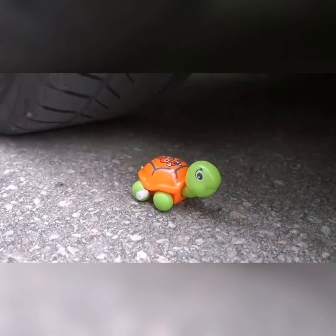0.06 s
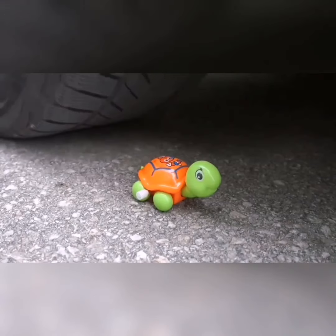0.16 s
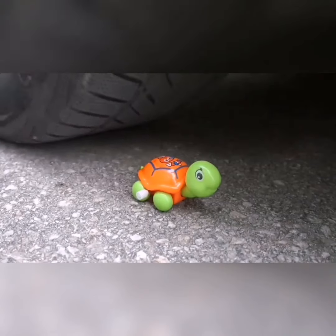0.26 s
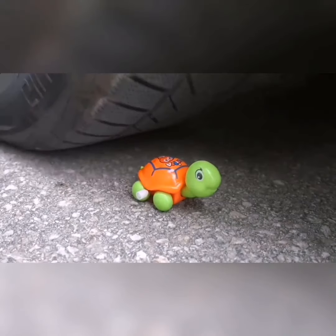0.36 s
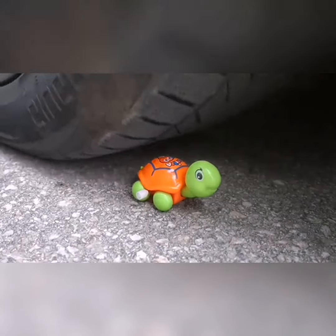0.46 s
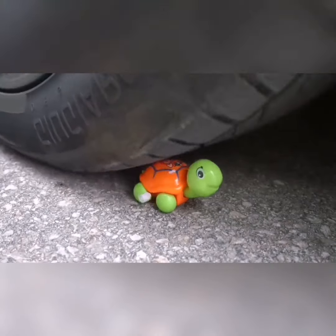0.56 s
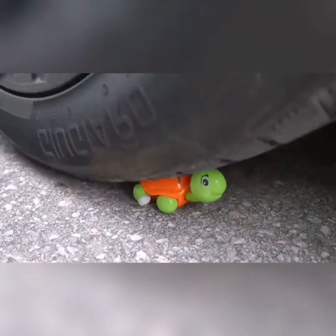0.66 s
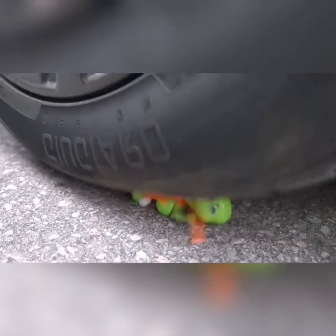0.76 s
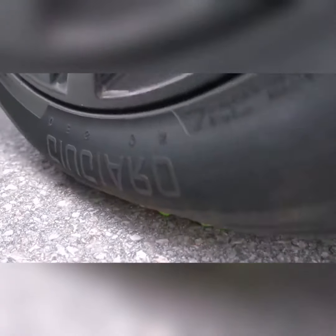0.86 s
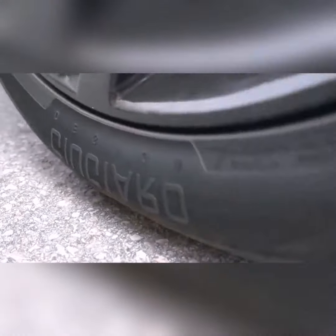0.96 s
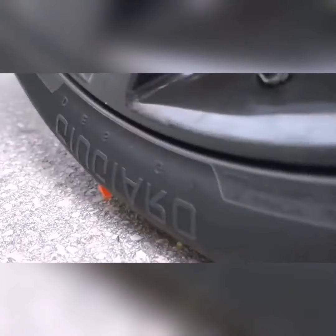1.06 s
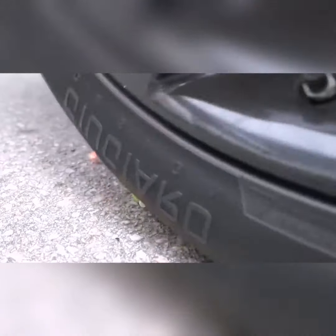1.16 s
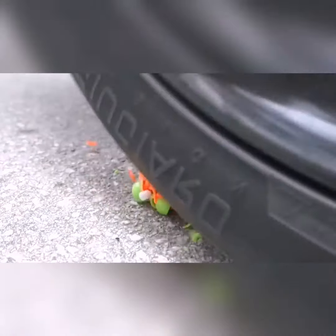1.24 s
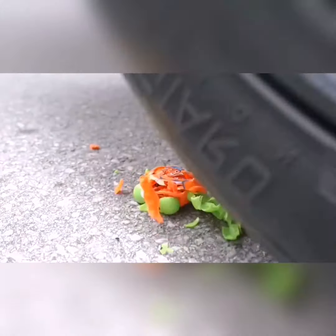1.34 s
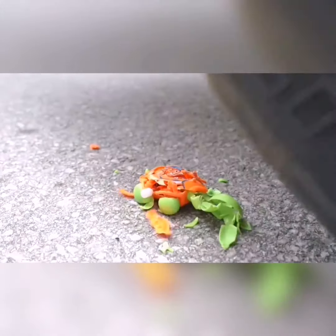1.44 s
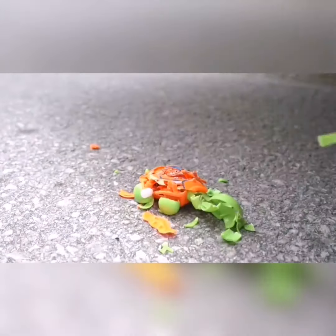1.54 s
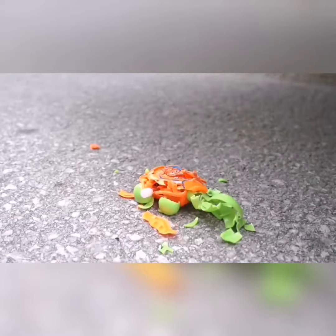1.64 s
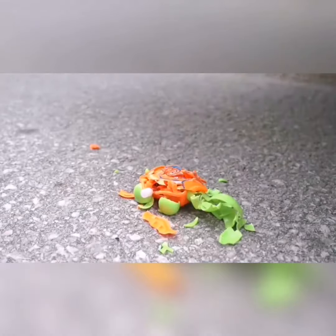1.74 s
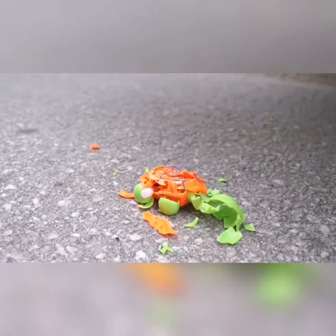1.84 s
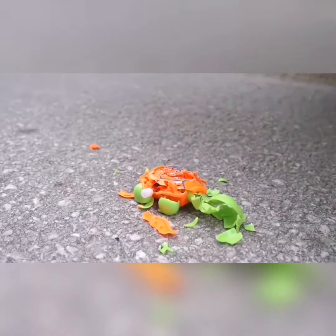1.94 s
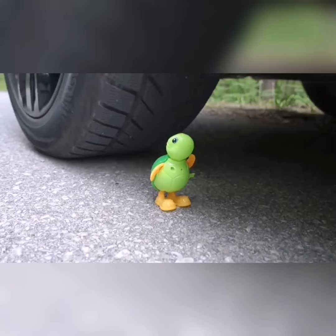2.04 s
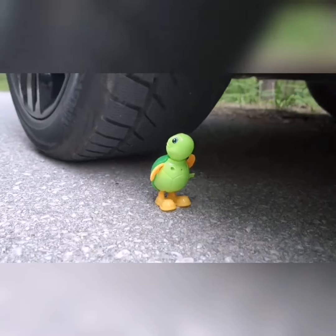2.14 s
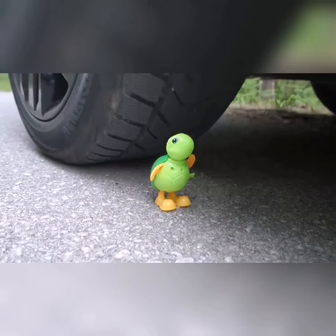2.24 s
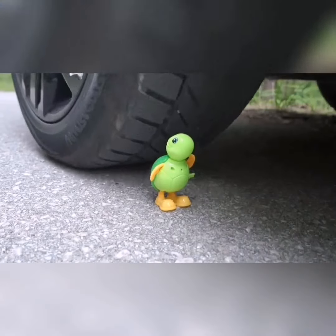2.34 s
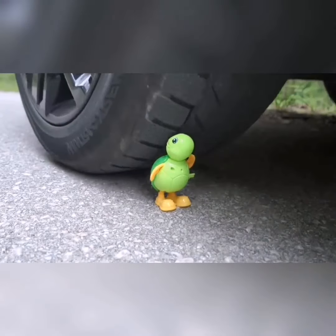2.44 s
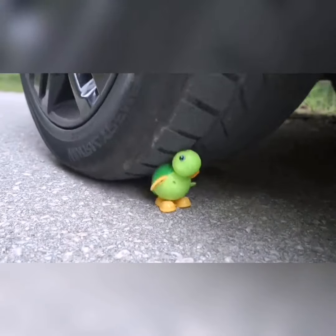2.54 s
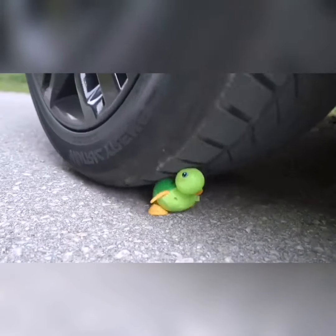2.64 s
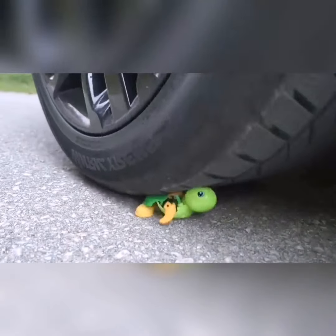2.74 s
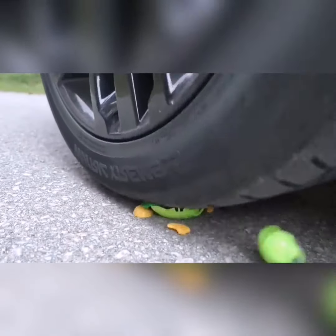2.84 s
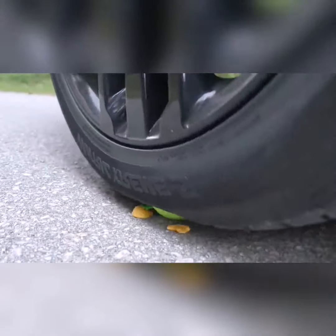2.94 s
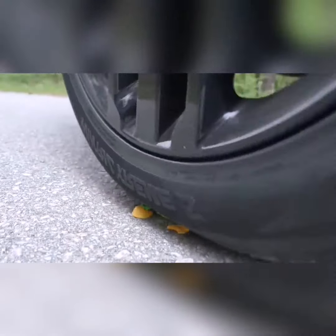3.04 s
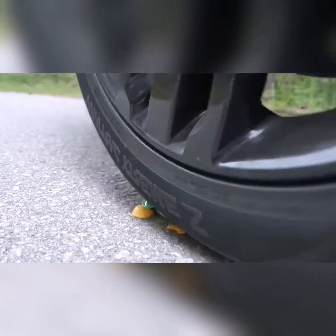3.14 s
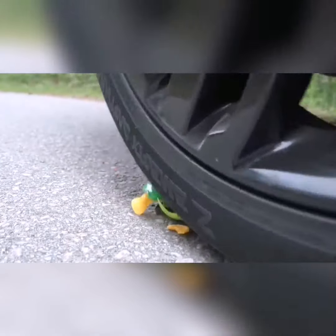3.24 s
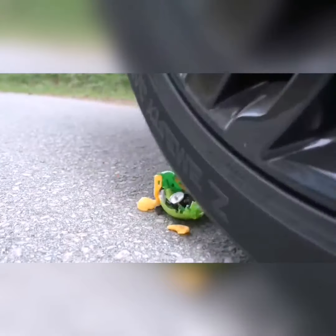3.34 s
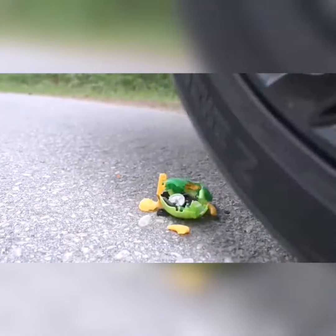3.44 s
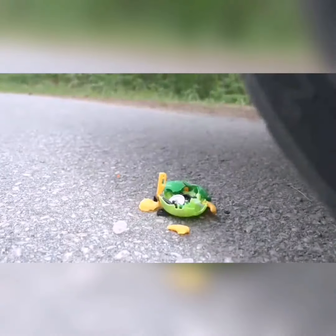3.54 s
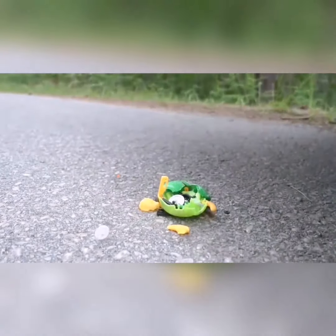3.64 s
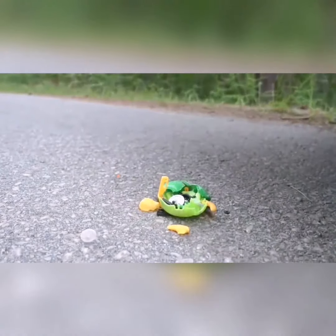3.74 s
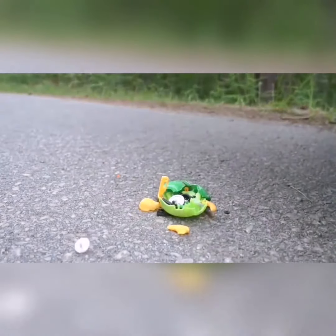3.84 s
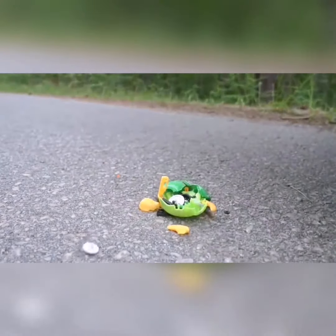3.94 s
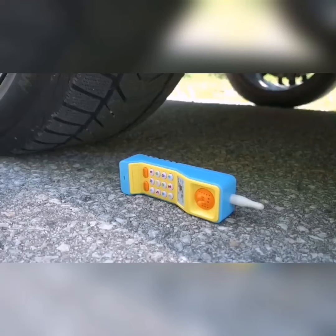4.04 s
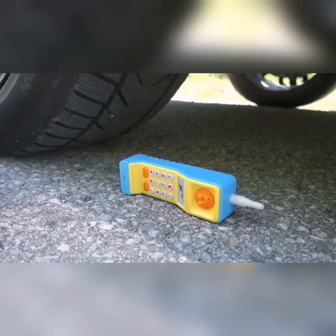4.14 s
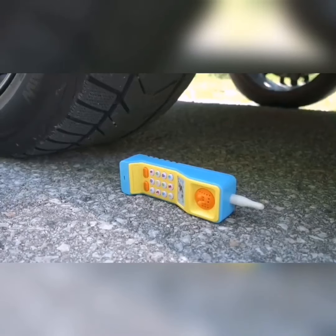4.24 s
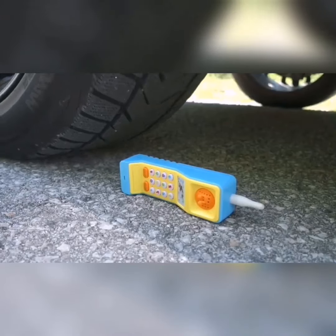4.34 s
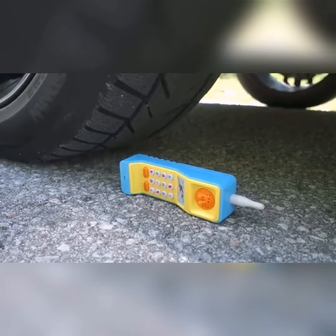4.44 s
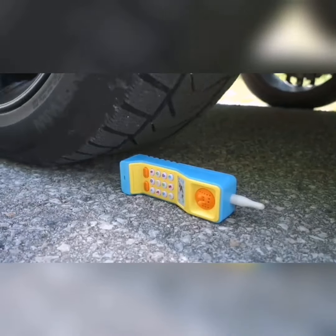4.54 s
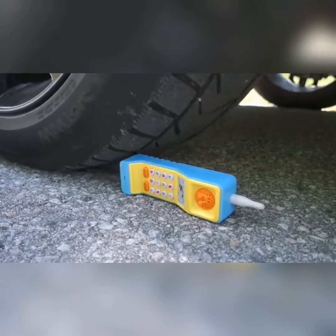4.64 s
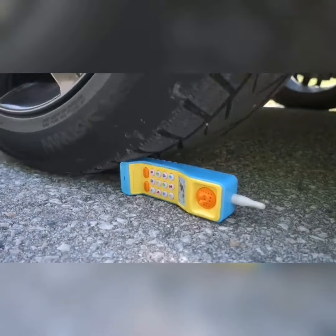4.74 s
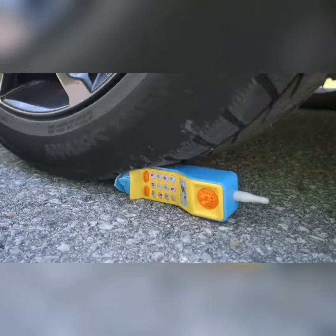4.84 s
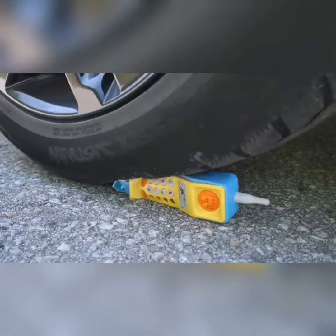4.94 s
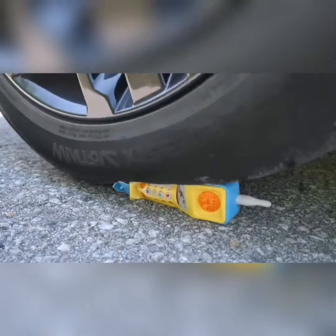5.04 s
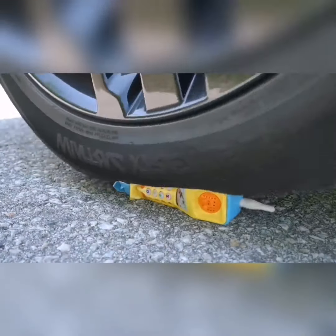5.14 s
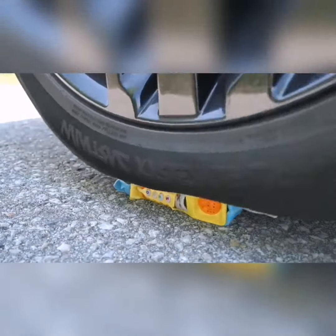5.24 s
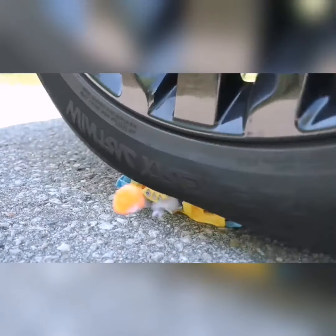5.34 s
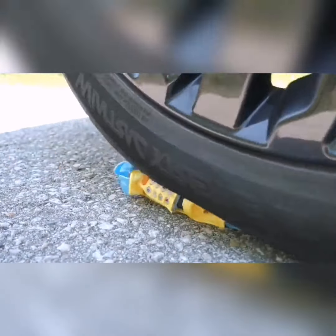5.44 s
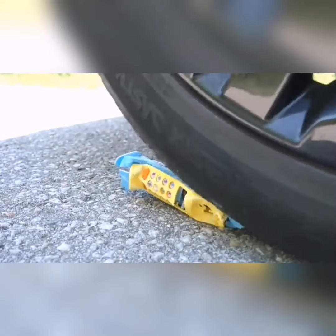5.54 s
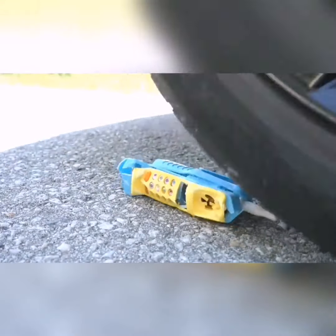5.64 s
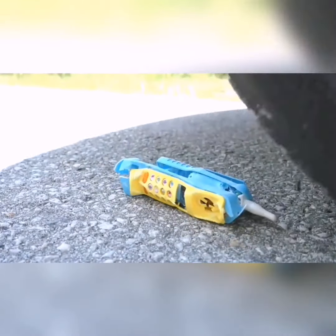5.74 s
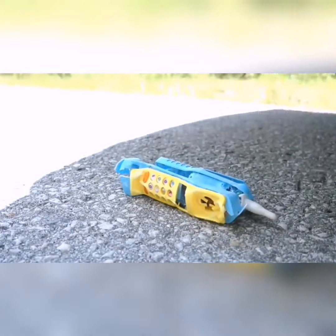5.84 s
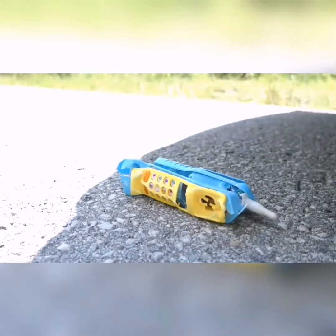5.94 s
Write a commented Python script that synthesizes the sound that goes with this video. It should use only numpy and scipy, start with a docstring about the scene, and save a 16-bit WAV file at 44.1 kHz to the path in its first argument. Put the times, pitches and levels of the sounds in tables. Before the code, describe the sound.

Close-up brittle plastic crunches under a rolling tyre in three separate bursts, ticking fragments between them, over a low car murmur.

```python
"""First the low murmur of a car on asphalt, then it creeps over three hollow plastic toys close to the
microphone: a turtle, a bird, a toy phone. Each shell gives way in sharp cracks and a crunch of hundreds of small
snaps; fragments knock under the rubber, the tyre thuds and the air inside it hums at one beating pitch.
Loose pieces tick as the wheel rolls off. Shards and knocks are damped sines, car and tread coloured noise."""
import sys
import numpy as np
from scipy import signal
from scipy.fft import rfft, irfft
from scipy.io import wavfile
from scipy.ndimage import uniform_filter1d

SR = 44100
rng = np.random.default_rng(int(sys.argv[2]) if len(sys.argv) > 2 else 0)


def master(y):
    """Save y as 16-bit WAV."""
    cut = np.clip(np.atleast_2d(y).T, -1, 1)
    pcm = np.round(cut * 32767)  # scale
    wavfile.write(sys.argv[1], SR, pcm.astype(np.int16))


N = 263718
TIME = np.arange(N) / SR   # s
AGE = TIME[:4096]   # s, time axis of one short sound or response
CUTOFF_HZ = 11200

# The car rolling. Each row: time in seconds, murmur level in dB, tread hiss level in dB.
ROLLING = [(0, -48.5, -55.5), (.3, -47, -51.5), (.6, -47, -47.5), (1.35, -58, -64), (1.58, -53, -60),
           (1.68, -48.5, -44.5), (2.0, -48, -46), (2.04, -50, -56), (2.52, -49, -49.5), (3.5, -51, -47),
           (3.98, -48, -51), (4.02, -52, -55), (4.28, -48.5, -50.5), (4.38, -46.5, -46.5),
           (4.55, -49.5, -47.5), (4.75, -45, -43), (5.8, -54.5, -54.5), (5.98, -50.5, -48.5)]
# Deep rumble of the car. Each row: time in seconds, level in dB.
RUMBLE = [(0, -71), (2.0, -57), (2.06, -61), (3.6, -54), (4.7, -64), (5.98, -59)]
# Faint whistles from the car as it first draws near. Each row: pitch in Hz, width in Hz, relative level in dB.
WHISTLES = [(1183, 14, -65), (2690, 49, -58), (3730, 23, -66), (4760, 29, -68)]
# Strength of those whistles. Each row: time in seconds, gain in dB.
WHISTLING = [(0, -13), (.7, 7), (2.0, -13), (2.04, -26)]
# Colour of the car's murmur. Each row: frequency in Hz, relative level in dB.
MURMUR_COLOUR = [(18, -5), (30, -17), (146, -4.5), (161, -11), (196, 7.5), (257, -3.5), (298, 2.5),
                 (355, -6), (382, 2.5), (514, -3.5), (582, 2), (864, -9), (1160, -8.5), (2690, -19),
                 (11000, -39.5), (14300, -81), (22000, -120)]
# Colour of the tread hissing on asphalt. Each row: frequency in Hz, relative level in dB.
HISS_COLOUR = [(300, -9), (900, 2), (1600, 5), (2800, 2), (5000, -9), (10500, -17), (14000, -57)]
# Turtle, bird, phone under the wheel. Each row: first touch in seconds, tread lifts off in seconds,
# debris and body resonances end at in seconds, relative level of loose debris in dB.
TOYS = [(0.627, 1.325, 2.02, -7.5), (2.532, 3.504, 3.74, -8.5), (4.716, 5.717, 5.98, -14)]
# A shell gives way in stages, the last ones as it springs back behind the tyre. Each row: start in seconds,
# hold in seconds, fade in dB per second, then relative levels in dB of splintering, knocking under the tread
# and tyre thud.
COLLAPSES = [(0.631, 0.08, 98, -21, -25.5, -37), (0.712, 0.013, 177, -41, -14.5, -25),
             (0.846, 0.039, 136, -26, -17, -19), (0.935, 0.044, 85, -25, -17, -34),
             (1.122, 0.035, 167, -50, -26, -34), (1.286, 0.012, 185, -31.5, -33.5, -41.5),
             (2.586, 0.13, 130, -23.5, -30.5, -30.5), (2.721, 0.14, 145, -21, -19, -27),
             (3.048, 0.052, 103, -38.5, -25.5, -57), (3.255, 0.033, 42, -41, -48, -50),
             (3.336, 0.026, 500, -29.5, -55, -58), (3.831, 0.16, 397, -48, -56, -51.5),
             (4.731, .025, 150, -39, -37, -45), (4.826, 0.091, 96, -18.5, -21.5, -26),
             (4.971, 0.033, 195, -19, -20.5, -38), (5.255, 0.017, 118, -23, -16, -27),
             (5.33, 0.037, 110, -21, -19.5, -31), (5.475, .25, 226, -36.5, -53, -72)]
# Cracks and ticks that stand out. Each row: start in seconds, relative level of the snap in dB,
# pitch of the shard in Hz, relative level of the knock in dB, left over right in dB.
CRACKS = [(0.632, -13, 1900, -24, 2), (0.6463, -10, 3150, -33, 6.5), (0.7108, -1.5, 2200, -10, 8),
          (0.7866, -7, 1970, -43, 7), (0.851, -2.5, 3500, -15.5, 2), (0.8564, -4.5, 1910, -12, 8),
          (0.9153, -10.5, 3400, -26, -4), (0.9212, -10, 5400, -24, -0.5), (0.9717, -7, 2600, -7.5, 5),
          (0.9784, -22, 2160, -11.5, 9), (1.0226, -23, 2450, -11, 8), (1.049, -15, 2690, -26, 1),
          (1.0635, -10.5, 2320, -19, 7), (1.1241, -18, 4000, -9, 8), (1.1519, -16.5, 2720, -19, 4.5),
          (1.1772, -12, 7900, -21, 13), (1.2158, -20, 3880, -27, 1.0), (1.2298, -17.5, 2610, -47, 3.0),
          (1.2724, -13.5, 6170, -33, 22), (1.281, -8.5, 5500, -25, 3), (1.3261, -14.5, 7900, -45, 13),
          (1.3943, -32, 3800, -57, 11), (1.4474, -28.5, 3680, -39, 11), (1.5377, -34, 2670, -45, 26),
          (1.8467, -20.5, 3630, -56, 10), (2.5508, -11, 3600, -22, 6.5), (2.5919, -8.5, 2570, -26, 3),
          (2.6067, -7, 2900, -39, 10), (2.6556, -3, 3360, -18.5, 9), (2.6911, -3.5, 3200, -19, 7),
          (2.7445, -5, 1850, -13, 14), (2.7692, -0.5, 4400, -20, 5), (2.8509, -7.5, 4630, -21, 9),
          (2.8799, -7.5, 8000, -18, 11), (2.9464, -5.5, 2110, -11, 10), (2.9816, -12.5, 4170, -16.5, 3.5),
          (3.082, -12, 2060, -18, 12), (3.0963, -9.5, 4640, -15, 2), (3.1602, -15, 1870, -39, 7.0),
          (3.1688, -12.5, 6250, -31, 6), (3.2046, -24, 1970, -37, 3.0), (3.238, -18.5, 1950, -35, 3),
          (3.268, -8, 4370, -32, 7), (3.275, -7, 4600, -27.5, 3), (3.3053, -11, 4700, -38, 3.5),
          (3.3641, -7.5, 4720, -45, 7), (3.467, -14, 5180, -32.5, 13), (3.4999, -19.5, 2120, -40, 2),
          (3.5759, -21.5, 2600, -42.5, 6), (3.724, -24, 2070, -40, 9), (3.8122, -21, 3730, -49, 18),
          (3.8243, -15, 7300, -42, 9), (3.909, -26.5, 2340, -56, 8), (4.2279, -32, 1830, -45, -1),
          (4.358, -38, 2200, -38.5, -5), (4.4209, -33, 2040, -47, 8), (4.7227, -22.5, 2380, -44, 2),
          (4.7483, -10, 1930, -36, 1), (4.8304, -5.5, 2690, -24, 1.0), (4.8384, -3.5, 2020, -13.5, -3),
          (5.003, -5, 3770, -14, -2), (5.0424, -7, 2640, -46, -1), (5.1735, -12.5, 2200, -24, 1),
          (5.1924, -11.5, 2350, -35, 1), (5.2574, -14, 1900, -17, 2), (5.2676, -5.5, 2380, -13.5, -3),
          (5.4038, -13, 2420, -17, -4), (5.4714, -13, 4620, -32, -3), (5.4829, -8, 3700, -32, 5),
          (5.513, -19, 2780, -24.5, -2), (5.5373, -10, 3010, -31, 3.0), (5.6144, -11.5, 3930, -54, 5),
          (5.6204, -16, 3180, -41, 3.0), (5.6448, -6, 3080, -47, 1), (5.7124, -13, 4420, -52, 0),
          (5.899, -26.5, 9500, -50, -8)]
# Colour of breaking plastic. Each row: frequency in Hz, relative level in dB.
PLASTIC_COLOUR = [(200, -62), (800, -1), (1300, -5.5), (2200, -3.5), (4200, -0.5), (6500, -1.5),
                  (10500, -4), (14000, -39.5)]
# Muffled colour of knocks under the rubber. Each row: frequency in Hz, relative level in dB.
KNOCK_COLOUR = [(100, -6.5), (300, 2), (480, 2), (800, 8), (1150, 4.5), (2500, -14.5), (8000, -66)]
# Resonances of each toy's body. Each row: frequency in Hz, width in Hz, lift in dB.
TURTLE_BODY = [(799.4, 13, 7), (1380, 97, 4), (1900, 150, 2.5), (2120, 62, 0), (2490, 37, 3.5),
               (4830, 730, -1)]
BIRD_BODY = [(850, 76, 1.6), (1330, 330, 3.7), (1990, 140, 0.68), (3150, 180, 2.2), (4140, 52, 1.4),
             (4700, 150, 1.8)]
PHONE_BODY = [(523, 110, 5.8), (794, 20, 1.7), (1330, 410, 2.9), (2070, 31, 5.3), (2370, 210, 1.9),
              (2930, 35, 2.6), (3900, 1300, 2.1)]
# Colour of the tyre's thud. Each row: frequency in Hz, relative level in dB.
THUD_COLOUR = [(15, 2), (35, -14.5), (90, -0.5), (150, 1), (250, 4.5), (340, -3), (480, -7), (1200, -21),
               (4000, -81)]
# Air in the tyre ringing after the tread drops. Each row: fullest at in seconds, swell in seconds,
# hold in seconds, relative level in dB, share of the beating twin mode (ratio).
CAVITY = [(0.75, 0.027, .005, -25.5, 0.42), (0.882, .03, 0.25, -25.5, 0.61),
          (2.636, 0.022, 0.27, -30, 0.31), (2.914, .04, 0.16, -25.5, 0.23),
          (4.888, 0.064, 0.0091, -24, 0.27), (5.076, 0.057, 0.009, -31.5, 0.091),
          (5.308, 0.046, 0.11, -33.5, 0.48)]
# Dull bumps, scuffs and a long low ring of the released tyre. Each row: start in seconds, pitch in Hz,
# width in Hz, relative level in dB, time to fall 60 dB in seconds.
BUMPS_AND_RINGS = [(1.285, 238, 2.3, -36, 0.83), (1.569, 75, 24, -31, 0.19), (3.635, 695, 320, -40, 0.19),
                   (4.014, 380, 200, -35, 0.34), (4.02, 60, 66, -39.5, 0.64),
                   (4.119, 268, 70, -29.5, 0.091), (4.123, 138, 36, -27, 0.21)]
# Blows on a hollow piece of shell. Each row: start in seconds, relative level in dB.
SHELL_BLOWS = [(2.55, -30), (3.3797, -32), (3.5017, -42), (3.8258, -29.5), (4.748, -36)]
# Modes of the hollow piece. Each row: pitch in Hz, relative level in dB, time to fall 60 dB in seconds.
SHELL_MODES = [(1174, 12.5, 0.026), (1320, -22, 0.036), (1500, 14, 0.017), (1720, 7, 0.02)]

SPLINTER_ATTACK_S, KNOCK_ATTACK_S, THUD_ATTACK_S = 0.0028, 0.0027, 0.0076
KNOCK_FADE_SHARE, THUD_FADE_SHARE = 0.96, 0.82   # of the splintering's rate of fading
RUN_ON_GAP_S, RUN_ON_LOSS_DB = .003, 3   # a crack runs on in smaller snaps: mean gap, step in level
CAVITY_HZ, CAVITY_SPLIT_HZ = 186.4, 14.17   # the rolling wheel splits the mode in two
CAVITY_FADE_DB_PER_S = 89.5
CRUMBS_DB = -38   # fine crumbs that keep trickling, against the loose pieces
TICKS_PER_S, TICK_SPREAD_DB, TICK_FADE_DB_PER_S = 24, 4.5, 45.5


def from_db(db):
    """Decibels to gain."""
    return 10 ** (np.asarray(db) / 20)


def rms_one(x):
    """Scale to unit power."""
    return x / np.sqrt(np.mean(x ** 2) + 1e-20)


def energy_one(x):
    """Scale a response to unit energy a channel."""
    return rms_one(x) / np.sqrt(x.shape[-1])


def gains(rows):
    """The dB columns of a curve as gains in time, silent outside it."""
    s, *columns = np.transpose(rows)
    return np.array([from_db(np.interp(TIME, s, c, left=-120, right=-120)) for c in columns])


def pan(db):
    """Channel gains for a left-right difference."""
    return energy_one(from_db([[db / 2], [-db / 2]]))


def add(out, s, sound):
    """Mix a sound in at a time."""
    at = int(s * SR)
    out[..., at:at + sound.shape[-1]] += sound[..., :N - at]


def through(x, response):
    """Convolve, keeping the length."""
    return signal.oaconvolve(np.atleast_2d(x), np.atleast_2d(response), axes=-1)[:, :x.shape[-1]]


def filter_of(spectrum):
    """Causal (minimum-phase) response with the given colour."""
    hz, db = np.transpose(spectrum)
    size = len(AGE)
    log_hz = np.log(np.fft.rfftfreq(size, 1 / SR) + 1)
    cepstrum = irfft(np.log(from_db(np.interp(log_hz, np.log(hz), db))))
    # folding the cepstrum onto positive times puts the energy as early as possible
    return energy_one(irfft(np.exp(rfft(2 * cepstrum[:size // 2], size))))


def ring(x, hz, t60):
    """A unit click sets a damped sine of height 1 ringing."""
    r = from_db(-60 / (t60 * SR))
    w = 2 * np.pi * hz / SR
    return signal.lfilter([0, np.sin(w)], [1, -2 * r * np.cos(w), r * r], x + 1e-18)


def resonance(x, hz, width_hz):
    """Band-pass with unit gain on top."""
    r = np.exp(-np.pi * width_hz / SR)
    zeros = (1 - r * r) / 2 * np.array([1, 0, -1])
    poles = [1, -2 * r * np.cos(2 * np.pi * hz / SR), r * r]
    return signal.lfilter(zeros, poles, x + 1e-18)


def levelled(x, window_s):
    """Even out the slow level, keeping the grain."""
    power = uniform_filter1d(x ** 2, max(int(window_s * SR), 2))
    return x / np.sqrt(np.abs(power) + np.mean(x ** 2) / 20)


def envelope(s, attack_s, hold_s, fade_db_per_s):
    """Attack, hold, then a steady fall in dB."""
    age = np.maximum(TIME - s, 0)
    return (1 - np.exp(-age / attack_s)) * from_db(-fade_db_per_s * np.maximum(age - hold_s, 0))


def wide_noise(spectrum, side_db):
    """Coloured noise: a part alike in both channels plus a part of opposite sign."""
    mid, side = rng.standard_normal((2, N))
    return rms_one(through(mid + from_db(side_db) * side * [[1], [-1]], filter_of(spectrum)))


def random_clicks(per_s, spread_db):
    """Tiny failures at random moments: many weak, a few strong."""
    sizes = from_db(spread_db * np.minimum(rng.exponential(1, N), 4)) * rng.choice([-1, 1], N)
    return levelled(sizes * (rng.random(N) < per_s / SR), window_s=.025)


def under_car(x, scatter_db, scatter_s, tail_db, tail_s):
    """Direct sound, right channel 0 to 3 samples late; scatter off tyre and road; tail from the underbody."""
    scatter = energy_one(rng.standard_normal((2, len(AGE))) * np.exp(-AGE / scatter_s))
    tail = energy_one(rng.standard_normal((2, len(AGE))) * np.exp(-AGE / tail_s))
    paths = from_db(scatter_db) * scatter + from_db(tail_db) * tail
    paths[[0, 1], [0, rng.integers(0, 4)]] += 1
    return through(x, paths)


def snap(hz, colour, ring_db, tear_s=0.00083, rise_s=0.00041, tear_db=2.5, cycles=26):
    """A crack lets go in one sharp step amid a brief tearing; the freed shard rings in a few modes."""
    tear_shape = (1 - np.exp(-AGE / rise_s)) * np.exp(-AGE / tear_s)
    tear = energy_one(rng.standard_normal(len(AGE)) * tear_shape)
    step = 1. * (np.arange(len(AGE)) == int(rise_s * SR))
    ratios = np.array([1, rng.uniform(0.418, 0.932), rng.uniform(1.125, 2.17)])
    pitches = np.minimum(hz * ratios, CUTOFF_HZ)
    shard = sum(g * energy_one(ring(step, f, cycles / f)) for f, g in zip(pitches, (1, .5, .5)))
    burst = energy_one(through(step + from_db(tear_db) * tear, colour)) + from_db(ring_db) * shard
    return energy_one(under_car(burst, scatter_db=-6.5, scatter_s=0.0055, tail_db=-5.5, tail_s=0.016))


def knock(colour, low_hz=470, high_hz=900, cycles=7):
    """Plastic pressed between rubber and road gives way with a short, damped note."""
    hz = rng.uniform(low_hz, high_hz)
    note = ring(1. * (AGE == 0), hz, cycles / hz)
    heard = under_car(note, scatter_db=-6, scatter_s=0.018, tail_db=-9.5, tail_s=0.02)
    return energy_one(through(heard, colour))


def crunch(clicks, responses, run_s):
    """One fragment takes the load and snaps again and again, then the next one does."""
    changes = np.cumsum(rng.random(N) < 1 / (run_s * SR))
    dealt = rng.integers(0, len(responses), N)[changes]
    out = np.zeros((2, N))
    for at in np.flatnonzero(clicks):
        add(out, at / SR, clicks[at] * responses[dealt[at]])
    return out


def car():
    """Murmur and rumble of the car, hiss of the tread on asphalt, thin whistles: all filtered noise."""
    murmur_level, hiss_level = gains(ROLLING)
    murmur = murmur_level * wide_noise(MURMUR_COLOUR, side_db=-18) * pan(db=1.5)
    hiss = hiss_level * wide_noise(HISS_COLOUR, side_db=1) * pan(db=5.0)
    rumble_colour = [(15, -18), (50, 3), (90, 4.5), (160, 2.5), (600, -53)]   # Hz, relative dB
    rumble = gains(RUMBLE) * wide_noise(rumble_colour, side_db=-45)
    whistles = sum(from_db(db) * rms_one(resonance(rng.standard_normal(N), hz, width))
                   for hz, width, db in WHISTLES)
    return murmur + hiss + rumble + gains(WHISTLING) * whistles * pan(db=0.0)


def looseness():
    """Strength of the loose debris: it builds up under the wheel and fades once the tread has lifted."""
    return sum(from_db(db) * envelope(touch, 0.17, lift - touch, TICK_FADE_DB_PER_S) * (TIME < end)
               for touch, lift, end, db in TOYS)


def loose_pieces(level):
    """Freed fragments tick at random against the road and each other."""
    plastic = filter_of(PLASTIC_COLOUR)
    clicks = (rng.random(N) < TICKS_PER_S / SR) * from_db(TICK_SPREAD_DB * rng.standard_normal(N))
    shards = [snap(hz, plastic, ring_db=2.0) for hz in np.geomspace(2500, 9000, num=12)]
    return crunch(level * clicks, shards, run_s=.02) * pan(db=2.5)


def collapsing():
    """Strength of splintering, knocking and thudding: every stage starts all three, adding in power."""
    power = np.zeros((3, N))
    for s, hold_s, fade, splinter_db, knock_db, thud_db in COLLAPSES:
        power[0] += (from_db(splinter_db) * envelope(s, SPLINTER_ATTACK_S, hold_s, fade)) ** 2
        power[1] += (from_db(knock_db) * envelope(s, KNOCK_ATTACK_S, hold_s, fade * KNOCK_FADE_SHARE)) ** 2
        power[2] += (from_db(thud_db) * envelope(s, THUD_ATTACK_S, hold_s, fade * THUD_FADE_SHARE)) ** 2
    return np.sqrt(power)


def splintering(level, knock_level):
    """The shell crumbles in hundreds of small snaps and knocks a second, over a finer grinding of crumbs."""
    plastic, muffled = filter_of(PLASTIC_COLOUR), filter_of(KNOCK_COLOUR)
    shards = [snap(hz, plastic, ring_db=-5.0) for hz in np.geomspace(1400, 7500, num=32)]
    snaps = crunch(random_clicks(per_s=340, spread_db=1.5), shards, run_s=.014)
    crumbs = crunch(random_clicks(per_s=870, spread_db=0.0), shards, run_s=.025)
    pressed = [knock(muffled) for _ in range(16)]
    knocks = crunch(random_clicks(per_s=240, spread_db=2), pressed, run_s=.006)
    bright = from_db(1.08) * level * (snaps + from_db(-3.5) * crumbs) * pan(db=3.5)
    return bright + from_db(-3.5) * knock_level * knocks * pan(db=2.5)


def run_on(crack, count=2):
    """A crack jumps on a few times, weaker at each jump."""
    out, s = crack.copy(), 0
    for k in range(count):
        s += RUN_ON_GAP_S * rng.uniform(.5, 1.5)
        later = np.pad(crack, ((0, 0), (int(s * SR), 0)))[:, :len(AGE)]
        out += from_db(-RUN_ON_LOSS_DB * (k + 3)) * later
    return out


def cracks_and_ticks(snap_db=16.0, reach=3, knock_db=22.0):
    """Single cracks and small ticks of grit: a snap, duller for a low pitch, over a quickly damped knock."""
    out = np.zeros((2, N))
    plastic, muffled = filter_of(PLASTIC_COLOUR), filter_of(KNOCK_COLOUR)
    for s, bright_db, hz, dull_db, side_db in CRACKS:
        softness = np.exp(-2 * np.pi * reach * hz / SR)   # one-pole low-pass at reach times the pitch
        softened = signal.lfilter([1], [1, -softness], snap(hz, plastic, ring_db=-6.0))
        crack = energy_one(run_on(softened))
        add(out, s, from_db(bright_db + snap_db) * crack * pan(side_db))
        thump = knock(muffled, low_hz=595, high_hz=830, cycles=4.3)
        add(out, s, from_db(dull_db + knock_db) * thump * pan(db=1.5))
    return out


def toy_bodies(breaks):
    """Each toy lifts its own resonances in whatever breaks inside it."""
    out = breaks.copy()
    for (touch, _, end, _), body in zip(TOYS, (TURTLE_BODY, BIRD_BODY, PHONE_BODY)):
        inside = breaks * (TIME > touch) * (TIME < end)
        out += sum((from_db(lift_db) - 1) * resonance(inside, hz, width) for hz, width, lift_db in body)
    return out


def tyre(thud_level):
    """The tread drops in small jolts as the toy yields, and the air cavity hums."""
    jolts = through(random_clicks(per_s=260, spread_db=0.5), filter_of(THUD_COLOUR))
    thud = jolts + from_db(-16.5) * wide_noise(THUD_COLOUR, side_db=11)
    return from_db(3.0) * thud_level * thud + cavity_hum()


def cavity_hum(wander=0.0137):
    """Air in the tyre swells, holds and dies away, beating with its twin mode, the phase wandering a little."""
    power = np.zeros(N)
    for s, swell_s, hold_s, db, twin in CAVITY:
        swell = np.clip(1 + (TIME - s) / swell_s, 0, 1)
        fade = from_db(db - CAVITY_FADE_DB_PER_S * np.maximum(TIME - s - hold_s, 0))
        beat = 1 + twin * np.cos(2 * np.pi * CAVITY_SPLIT_HZ * (TIME - s))
        power += (swell * fade * beat) ** 2
    phase = 2 * np.pi * CAVITY_HZ * TIME + wander * np.cumsum(rng.standard_normal(N))
    return np.sqrt(2 * power) * np.sin(phase + [[.15], [-.15]]) * pan(db=-2.0)   # left leads by 0.3 rad


def bumps_and_rings():
    """Soft bumps and rings that swell within a cycle or two and die away around one pitch."""
    out = np.zeros((2, N))
    for s, hz, width, db, t60 in BUMPS_AND_RINGS:
        narrow = resonance(resonance(rng.standard_normal(N), hz, width), hz, 3 * width)
        shudder = levelled(narrow, window_s=0.026)
        add(out, s, shudder * (1 - np.exp(-TIME * hz)) * from_db(db - 60 * TIME / t60))
    return out


def hollow_shell():
    """A hollow piece of shell, whole or already crushed, answers a blow with a short clack of damped modes."""
    out = np.zeros((2, N))
    for s, db in SHELL_BLOWS:
        clack = sum(from_db(db + mode_db) * rng.choice([-1, 1]) * ring(1. * (AGE == 0), hz, t60)
                    for hz, mode_db, t60 in SHELL_MODES)
        add(out, s, under_car(clack, scatter_db=-12, scatter_s=0.0065, tail_db=-17, tail_s=.02))
    return out * pan(db=12)


def scene():
    """Three crushes, one after the other, close by, over the sound of the car."""
    splinters, knocks, thuds = collapsing()
    loose = looseness()
    crumbling = splintering(np.hypot(splinters, from_db(CRUMBS_DB) * loose), knocks)
    plastic = from_db(-2.45) * toy_bodies(crumbling + cracks_and_ticks() + loose_pieces(loose))
    return plastic + hollow_shell() + tyre(thuds) + car() + bumps_and_rings()


def record(dry):
    """The highest peaks are rounded and the top is cut."""
    rounded = .66 * np.tanh(dry / .66)
    top_cut = signal.ellip(10, .2, 80, CUTOFF_HZ, fs=SR, output="sos")
    return signal.sosfilt(top_cut, rounded)


dry = scene()
out = record(dry)
master(out)
```